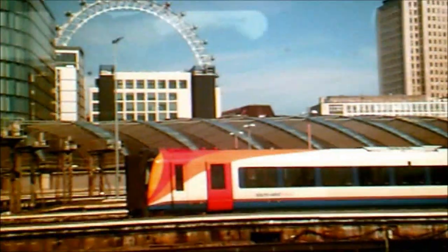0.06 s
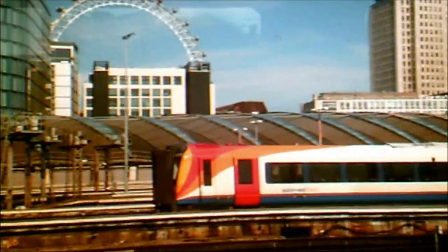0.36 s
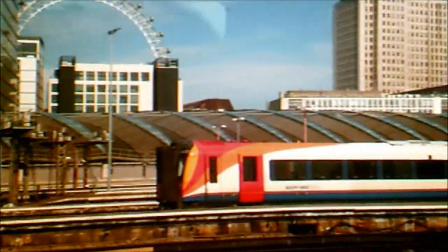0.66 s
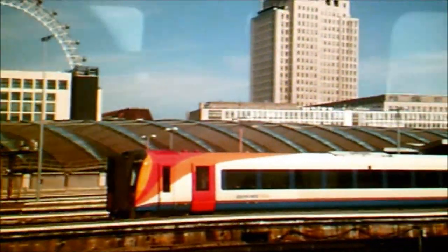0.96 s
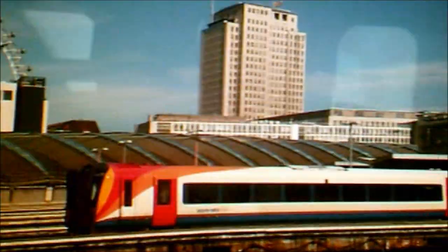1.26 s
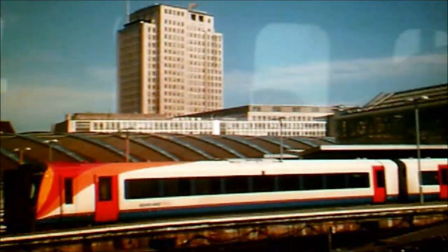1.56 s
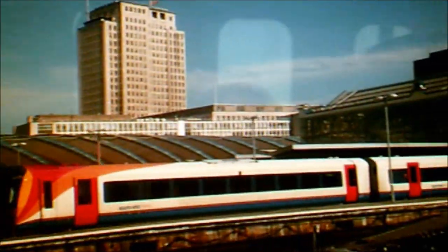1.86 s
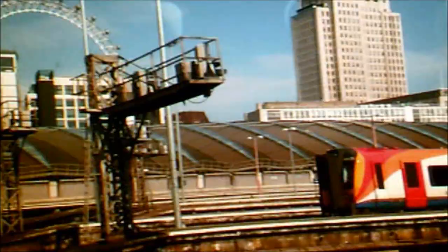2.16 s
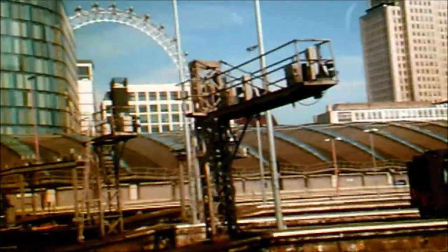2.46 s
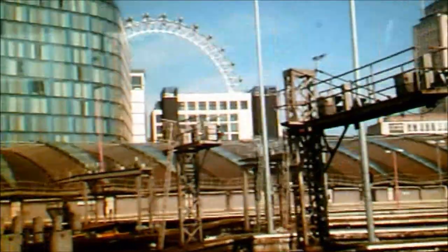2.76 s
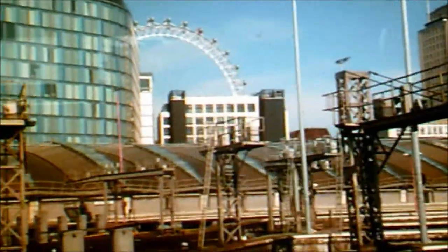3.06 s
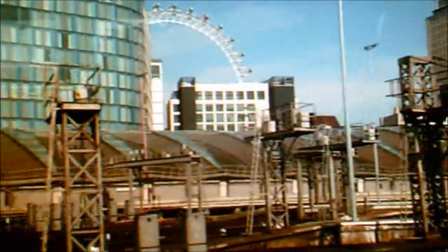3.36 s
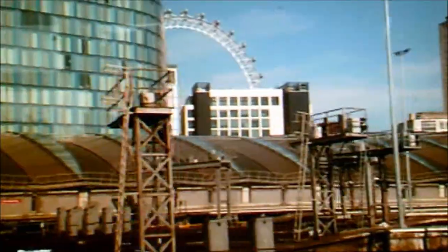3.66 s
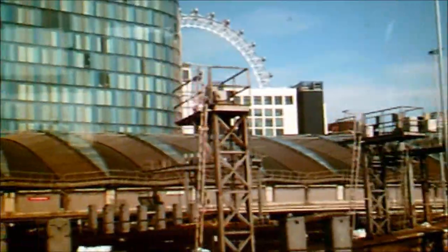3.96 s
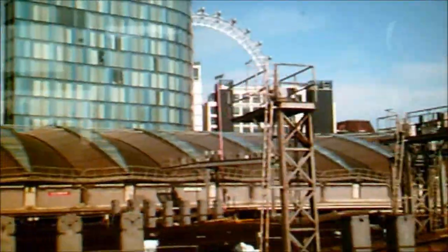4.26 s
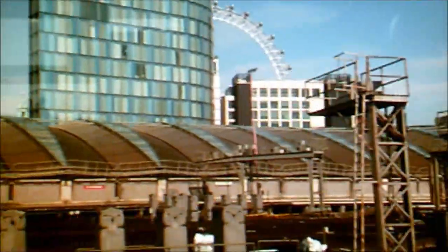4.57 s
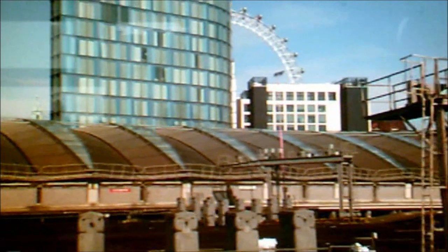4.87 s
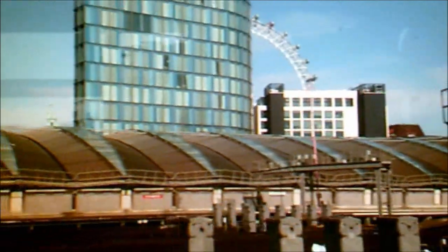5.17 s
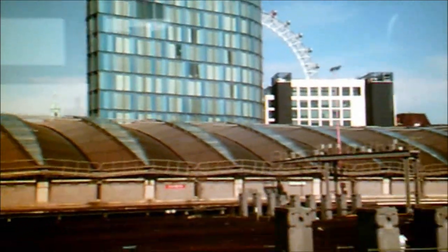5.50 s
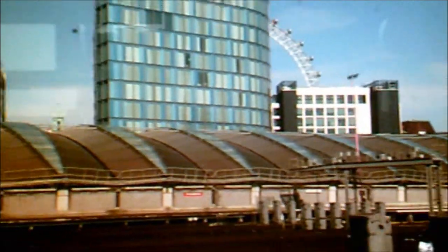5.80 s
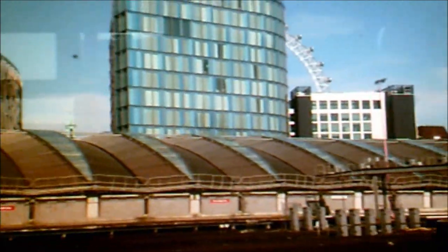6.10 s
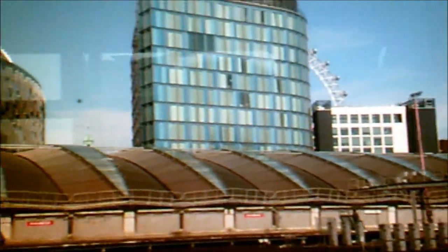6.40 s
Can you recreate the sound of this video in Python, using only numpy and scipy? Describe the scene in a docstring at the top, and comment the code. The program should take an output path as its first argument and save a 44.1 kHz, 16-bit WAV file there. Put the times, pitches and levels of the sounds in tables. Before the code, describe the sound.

A low, uneven boom and the roar of wheels on rough track are heard from within a train carriage. Irregular thuds and metallic clanks mix with short groans, grinding and a few dry ticks as the wheels cross the points. About six seconds in, the microphone is knocked and overloads with a sharp, loud double crack, and the noise falls to a soft rumble.

```python
"""Inside a passenger carriage, rolling slowly over the points outside a station, then running quietly.
Rough rails force the body to boom on its springs, the floor to drum and the wheels to roar. Wheels
strike joints and grind through the points; on the curve, stick-slip friction makes them groan and sing.
A faint hum, dry ticks and one hollow knock are heard. A small camera whines and drops out twice,
and one bump on its case overflows its range with a loud double crack."""
import sys
import numpy as np
from scipy import signal
from scipy.fft import rfft, irfft, next_fast_len
from scipy.io import wavfile
from scipy.ndimage import uniform_filter1d

SR = 44100
rng = np.random.default_rng(int(sys.argv[2]) if len(sys.argv) > 2 else 0)


def unload_wav(signal):
    """Save mono or channel-first audio to the path in sys.argv[1] as 16-bit WAV at rate SR, clipped to [-1, 1]."""
    wavfile.write(
        sys.argv[1],
        SR,
        np.round(np.clip(np.atleast_2d(signal).T, -1, 1) * 32767).astype(np.int16),
    )


N = 288414
T = np.arange(N) / SR

# rough track, then smooth: (time [s], rolling roar [dB], floor drumming [dB], flange scrub [dB])
RIDE_LEVELS = [(.11, -48.5, -37, -67.5), (.25, -55.5, -43.5, -71), (.45, -55, -44, -68.5),
               (.82, -50.5, -44, -68), (1.05, -48.5, -38, -66), (1.62, -50, -41, -67.5),
               (2.05, -46, -39.5, -65), (2.55, -45, -41.5, -68), (3.02, -45.5, -36, -66.5),
               (3.35, -43, -33, -67), (3.6, -45.5, -38.5, -65), (3.8, -42, -36, -64.5),
               (4.1, -45, -38, -60.5), (4.9, -45, -35.5, -64.5), (5.5, -47.5, -40, -66),
               (6.01, -48.5, -47.5, -70), (6.1, -63, -52.5, -85), (6.54, -61.5, -52, -84.5)]
# the body lurching on its springs: (start [s], length [s], level [dB])
BODY_LURCHES = [(0.27, 0.49, -23.5), (0.953, 0.32, -20), (1.26, 0.35, -23.5), (1.674, 0.36, -27),
                (2.194, 0.45, -26), (2.655, 0.12, -19.5), (3.219, 0.056, -13.5), (3.67, .31, -21),
                (4.23, 0.26, -18.5), (4.761, 0.26, -20), (5.195, 0.18, -19.5), (5.537, .45, -21),
                (6.038, 0.079, -28.5)]
# spectral envelopes: (frequency [Hz], relative level [dB])
BOOM_SPECTRUM = [(8, -31), (16, 2.5), (23, 5.5), (35, -3), (48, -4), (65, -14), (90, -26.5), (140, -44.5)]
FLOOR_SPECTRUM = [(50, -32), (90, 3), (138, 0.5), (172, -6), (215, -9), (300, -12), (400, -20), (700, -43)]
ROAR_SPECTRUM = [(150, -15.5), (300, 2.5), (430, -1), (600, -4.5), (850, -6), (1150, -8.5), (1550, -15.5),
                 (2050, -16.5), (2500, -19), (3100, -19), (3700, -36), (6000, -36.5), (11000, -62.5)]
SCRUB_SPECTRUM = [(1500, -23), (3000, 0.5), (4300, -0.5), (5300, -2), (6300, -5), (7500, -4), (9500, -5),
                  (11000, -15.5)]
CLANK_SPECTRUM = [(150, -5.5), (300, -2.5), (420, 4), (600, 4), (850, 1), (1150, -2), (1500, -9),
                  (2050, -12.5), (2500, -16), (3100, -16.5), (3800, -24.5), (9000, -46)]
CLASH_SPECTRUM = [(700, -14), (1800, 3.5), (3000, 5), (4100, -2.5), (5300, -2.5), (6500, -3), (9000, -7.5),
                  (11000, -19.5)]
# resonances of bogie and shell, flange and wheel: (frequency [Hz], bandwidth [Hz], gain [dB])
SHELL_MODES = [(336, 30, 5), (439, 48, 7), (522, 87, 1.5), (759.4, 35, 3), (845, 75, 1), (1096, 66, 2.5),
               (1970, 520, 4)]
FLANGE_MODES = [(5250, 350, 2.5), (7360, 300, 2)]
WHEEL_MODES = [(883, 37, -5), (2060, 140, 3), (2760, 80, 6.5), (3014, 62, -5), (4080, 80, -3.5),
               (4600, 35, -1), (5090, 120, -0.5), (5400, 31, -16), (7700, 50, -20)]
# the camera's electronic tones: (frequency [Hz], relative level [dB])
WHINE_TONES = [(5599, -90.5), (5798, -89), (6702, -85.5), (7402, -91.5), (9598, -89.5)]
# a wheel binding on the curve: (middle [s], length [s], pitch at the middle [Hz], level [dB])
WHEEL_GROANS = [(0.182, 0.51, 433, -49.5), (0.681, 0.33, 426, -55.5), (1.14, 0.067, 454, -40),
                (1.148, 0.26, 399, -46), (2.029, 0.36, 432, -39.5)]
# wheels striking joints and points:
# (time [s], thud [dB], clank [dB], clash [dB], ring [dB], rise [s], t60 of clank and clash [s])
JOINT_IMPACTS = [(.298, -34.5, -42.5, -62, -59.5, .004, 0.62), (.91, -32, -46, -78, -78, 0.011, 0.15),
                 (.963, -38, -42.5, -76, -71, 0.0046, 0.29), (1.378, -28, -38.5, -74, -69, 0.0041, 0.43),
                 (1.81, -33, -42.5, -62, -67, 0.023, 0.5), (2.198, -21.5, -35.5, -55, -59, 0.023, 0.56),
                 (2.647, -30, -41, -59, -56.5, 0.018, 0.71), (2.834, -24, -34.5, -48.5, -47, 0.0088, 0.49),
                 (3.23, -32, -36.5, -70, -64, 0.042, 0.53), (3.506, -46, -64, -57, -65, .016, 0.35),
                 (3.719, -28.5, -42, -64, -63, 0.021, 0.37), (3.903, -51, -50, -45, -63, 0.015, 0.4),
                 (4.066, -44, -68, -56.5, -67, 0.007, 0.18), (4.235, -30.5, -41, -64, -55, 0.015, 0.19),
                 (5.179, -34, -33.5, -68, -63, 0.01, 0.55)]
# wheels pressed against the points: (middle [s], length [s], grinding [dB], flange scrub [dB])
POINT_GRINDS = [(.51, 0.35, -51, -81), (1.202, 0.065, -50.5, -66), (1.04, 0.15, -54.5, -73),
                (1.93, 0.19, -48.5, -72), (2.297, .16, -51, -70), (2.942, 0.061, -48, -62),
                (3.215, .42, -44.5, -60.5), (4.333, .36, -45.5, -56.5), (4.784, 0.33, -44, -67),
                (5.224, 0.26, -45.5, -62), (5.878, 0.27, -45.5, -61.5), (6.243, 0.1, -63, -83.5)]
# dry clicks: (time [s], relative level [dB])
DRY_TICKS = [(1.2135, -20), (2.2235, -31), (2.938, -30), (2.944, -30), (4.11, -36), (4.15, -38),
             (4.835, -16), (4.859, -23), (5.9615, -19)]
# brief losses of signal: (start [s], end [s], gain [dB], offset [full scale])
SIGNAL_DROPOUTS = [(4.8354, 4.8585, -16, .02), (5.9415, 5.9615, -2, -.04)]
# a flange's trains of chirps: (middle [s], length [s], mean level [dB])
CHIRP_TRAINS = [(5.05, .3, -79), (5.355, .28, -68)]
# push and rebound on the camera: (time [s], half width [s], height before smoothing [full scale])
BUMP_PULSES = [(5.9335, .0085, -1.93), (5.9495, .018, .32)]


def undb(db):
    """Decibels to amplitude ratio."""
    return 10 ** (np.asarray(db) / 20)


def unit(x):
    """Normalisation to rms 1."""
    return x / np.sqrt(np.mean(x ** 2))


def noise():
    """White Gaussian noise."""
    return rng.standard_normal(N)


def wander(rate_hz):
    """Slow random modulation: random levels joined linearly, rms 1."""
    step = int(SR / rate_hz)
    levels = rng.standard_normal(N // step + 1)
    return unit(uniform_filter1d(np.repeat(levels, step), step)[:N])


def colour(x, spectrum, modes=()):
    """Source-filter shaping: a smooth spectral envelope with resonance peaks on top, rms 1."""
    size = next_fast_len(N)
    hz = np.maximum(np.fft.rfftfreq(size, 1 / SR), 1)
    knots_hz, db = np.transpose(spectrum)
    gain = undb(np.interp(np.log(hz), np.log(knots_hz), db))
    gain *= np.minimum(hz / knots_hz[0], 1) ** 2 * np.minimum(knots_hz[-1] / hz, 1) ** 2
    for centre, width, lift_db in modes:
        gain *= undb(lift_db / (1 + (2 * (hz - centre) / width) ** 2))
    return unit(irfft(rfft(x, size) * gain, size)[:N])


def steady(x, span_s):
    """Division by the running rms evens out the strength of a vibration."""
    return unit(x / np.sqrt(uniform_filter1d(x ** 2, int(span_s * SR)) + 1e-3))


def rough_contact(grain_db, rate_hz):
    """Contact force of rough steel: noise whose strength varies from one rough spot to the next."""
    return noise() * undb(grain_db * wander(rate_hz))


def wavering_tone(hz, width_hz):
    """Random modulation in quadrature spreads a tone into a narrow, fluttering band."""
    phase = 2 * np.pi * np.cumsum(np.full(N, hz)) / SR
    return steady(wander(width_hz) * np.sin(phase) + wander(width_hz) * np.cos(phase), span_s=.064)


def swell(middle, length):
    """Half-cosine envelope, 1 at its middle."""
    return np.cos(np.pi * np.clip((T - middle) / length, -.5, .5))


def gate(start, end, edge_s):
    """Trapezoidal envelope with its ramps centred on start and end."""
    return np.clip(np.minimum(T - start, end - T) / edge_s + .5, 0, 1)


def blow(start, rise, t60):
    """Envelope of a damped vibration: a linear rise, then an exponential decay."""
    decay = np.exp(-np.log(1000) * np.maximum(T - start - rise, 0) / t60)
    return np.clip((T - start) / rise, 0, 1) * decay


def rolling(roar_db, drum_db, scrub_db):
    """Forced vibration: rail roughness drives body, floor, shell and flanges; a rubbing wheel moans."""
    lurch_power = sum((undb(db) * gate(start, start + length, edge_s=.068)) ** 2
                      for start, length, db in BODY_LURCHES)
    boom_gain = np.sqrt(undb(drum_db + 10) ** 2 + lurch_power)  # follows the floor; powers add
    boom = steady(colour(noise(), BOOM_SPECTRUM), span_s=.056) * boom_gain
    drum = steady(colour(noise(), FLOOR_SPECTRUM), span_s=.098) * undb(drum_db)
    roar = colour(rough_contact(grain_db=1.1, rate_hz=54), ROAR_SPECTRUM, SHELL_MODES)
    scrub = colour(rough_contact(grain_db=.6, rate_hz=39), SCRUB_SPECTRUM, FLANGE_MODES)
    moan = wavering_tone(hz=436.5, width_hz=28) * undb(roar_db - 11)
    return boom + drum + roar * undb(roar_db) + scrub * undb(scrub_db) + moan


def hum(roar_db):
    """Narrow-band noise is heard as a faint wavering hum; its level follows the roar."""
    return wavering_tone(hz=725, width_hz=8) * undb(roar_db - 16)


def camera_whine():
    """Electronic self-noise: steady high tones over white hiss."""
    tones = sum(undb(db) * np.sqrt(2) * np.sin(2 * np.pi * hz * T) for hz, db in WHINE_TONES)
    return undb(2.5) * tones + undb(-72) * noise()


def wheel_groans(rise_hz_per_s=40):
    """Stick-slip friction drives a low wheel mode, whose pitch creeps up while the wheel binds."""
    out = np.zeros(N)
    for middle, length, hz, db in WHEEL_GROANS:
        pitch_hz = hz + rise_hz_per_s * (T - middle)
        out += wavering_tone(pitch_hz, width_hz=28) * swell(middle, length) * undb(db)
    return out


def wheel_ring():
    """Modal resonance: rough contact keeps the narrow modes of a steel wheel ringing."""
    force = noise()
    return unit(sum(undb(db) * signal.lfilter(*signal.iirpeak(hz, hz / width, fs=SR), force)
                    for hz, width, db in WHEEL_MODES))


def joint_impacts():
    """Impact excitation: as a wheel drops in, the floor thuds, the bogie clanks, steel clashes and rings."""
    thud = steady(colour(noise(), FLOOR_SPECTRUM), span_s=.025)
    clank = steady(colour(noise(), CLANK_SPECTRUM, SHELL_MODES), span_s=.014)
    clash = colour(rough_contact(grain_db=-3.4, rate_hz=180), CLASH_SPECTRUM)
    ring = wheel_ring()
    out = np.zeros(N)
    for start, thud_db, clank_db, clash_db, ring_db, rise, t60 in JOINT_IMPACTS:
        out += blow(start, rise, .72 * t60) * undb(thud_db) * thud  # the floor is better damped
        out += blow(start, rise, t60) * (undb(clank_db) * clank + undb(clash_db) * clash)
        out += blow(start, rise, 1.3 * t60) * undb(ring_db) * ring  # the wheel rings on
    return out


def grinding(tilt_db_per_octave=2.5):
    """Sliding friction: a wheel pressed against the points roars more brightly and its flange scrubs."""
    bright = [(hz, db + tilt_db_per_octave * np.log2(hz)) for hz, db in ROAR_SPECTRUM]
    grind = colour(rough_contact(grain_db=1.2, rate_hz=42), bright, SHELL_MODES)
    scrub = colour(rough_contact(grain_db=1.65, rate_hz=46), SCRUB_SPECTRUM, FLANGE_MODES)
    return sum(swell(middle, length) * (undb(grind_db) * grind + undb(scrub_db) * scrub)
               for middle, length, grind_db, scrub_db in POINT_GRINDS)


def ticks():
    """First-order relaxation: a sudden step that dies within a few samples is heard as a dry click."""
    impulses = np.zeros(N)
    for time, db in DRY_TICKS:
        impulses[int(time * SR)] = undb(db)
    return signal.lfilter([.5], [1, -.8], impulses)


def knock(start=4.825, hz=860):
    """One damped mode gives a small hollow knock inside the carriage."""
    return blow(start, rise=.0053, t60=.06) * np.sin(2 * np.pi * hz * (T - start)) * undb(-32)


def dropouts(x):
    """Attenuation and offset: the camera's signal briefly weakens and shifts off zero."""
    for start, end, db, offset in SIGNAL_DROPOUTS:
        lost = gate(start, end, edge_s=.003)
        x = (1 - lost) * x + lost * (undb(db) * x + offset)
    return x


def flange_song(chirps_per_s=26, depth_db=7.5):
    """Stick-slip friction: a flange slipping sideways sings one thin note, pulsed into chirps."""
    envelope = np.zeros(N)
    for middle, length, db in CHIRP_TRAINS:
        pulsing_db = depth_db * np.cos(2 * np.pi * chirps_per_s * (T - middle))
        envelope += swell(middle, length) * undb(db + pulsing_db)
    return wavering_tone(hz=5430, width_hz=110) * envelope


def camera_bump():
    """A pressure transient: a push on the case and its rebound, as two rounded triangular pulses."""
    pressure = sum(height * np.interp(T, [time - half, time, time + half], [0, 1, 0])
                   for time, half, height in BUMP_PULSES)
    return uniform_filter1d(pressure, size=90)


def low_pass(x, hz):
    """Band limiting by a steep twelfth-order filter."""
    return signal.sosfiltfilt(signal.butter(12, hz, fs=SR, output="sos"), x)


def overflow(x):
    """Wraparound: values beyond full scale jump to the other sign, each jump a broadband crack."""
    return (x + 1) % 2 - 1


def scene():
    """Superposition of the sources at a single microphone."""
    times, *levels = np.transpose(RIDE_LEVELS)
    roar_db, drum_db, scrub_db = (np.interp(T, times, db) for db in levels)
    running = rolling(roar_db, drum_db, scrub_db) + grinding() + joint_impacts()
    curve = wheel_groans() + flange_song()
    carriage = hum(roar_db) + knock()
    return (running + curve + carriage + camera_whine() + camera_bump())[None]


def record(dry, band_hz=11100, top_hz=16400):
    """Nonlinear distortion: dropouts and ticks are band-limited; only the overflow spreads higher."""
    wrapped = overflow(low_pass(dropouts(dry) + ticks(), band_hz))
    in_band = low_pass(wrapped, band_hz)
    crack_treble = undb(-14) * (wrapped - in_band)
    return low_pass(np.clip(in_band + crack_treble, -1, 1), top_hz)


dry = scene()
out = record(dry)
unload_wav(out)
```